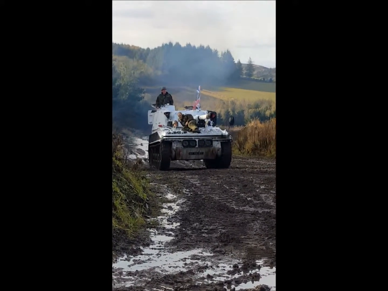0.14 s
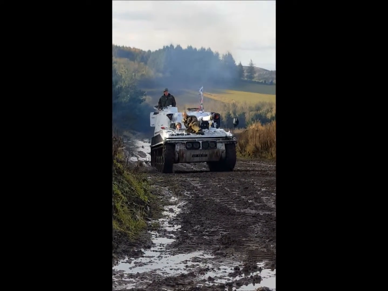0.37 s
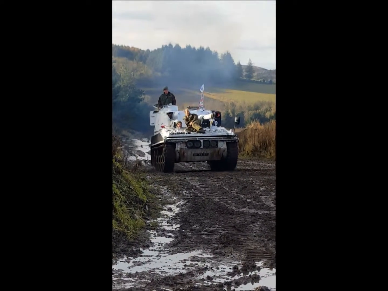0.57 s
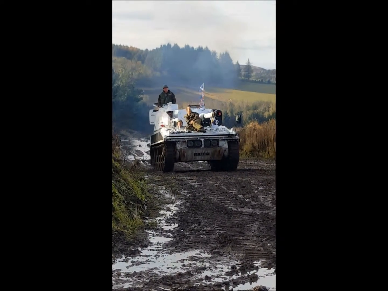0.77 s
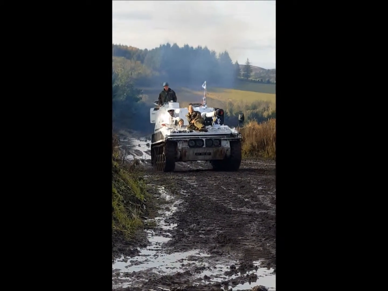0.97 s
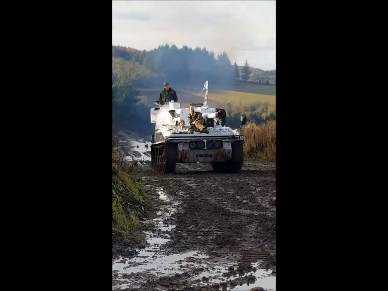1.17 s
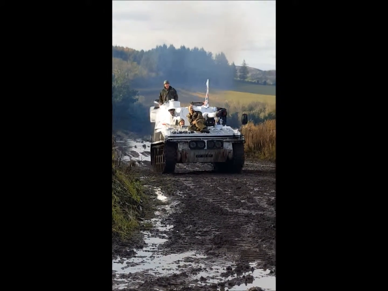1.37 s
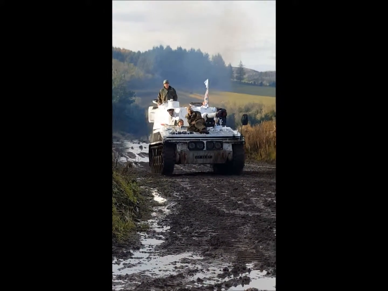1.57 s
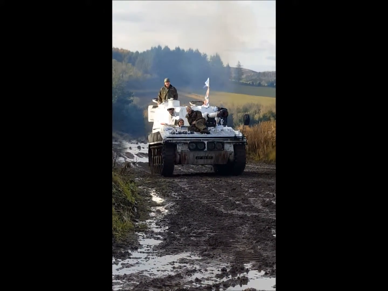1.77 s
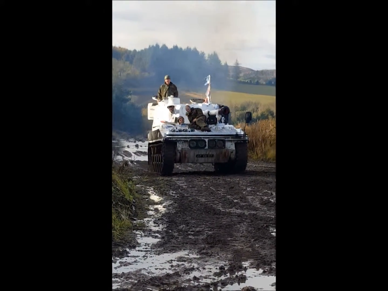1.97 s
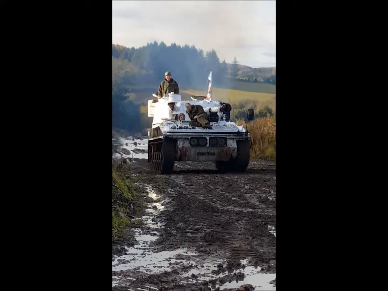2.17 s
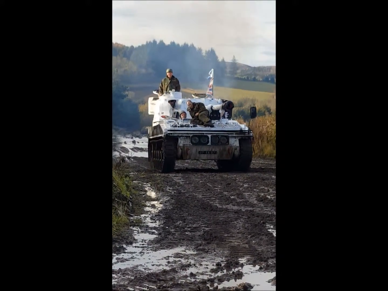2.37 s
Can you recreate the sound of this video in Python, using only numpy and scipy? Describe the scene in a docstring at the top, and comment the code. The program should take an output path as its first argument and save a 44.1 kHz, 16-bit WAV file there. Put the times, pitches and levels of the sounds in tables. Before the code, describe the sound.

Steady low engine hum and buzzing exhaust of a tracked vehicle dominate, over uneven bass rumble, rattling machinery and faint mud hiss, with short track groans near the end; open air, stereo microphone in front.

```python
"""Muddy track: a tracked vehicle crawls toward the microphone, its six-cylinder engine at near-steady revs.
Exhaust: a tone at the firing rate, cycle-locked lines of the uneven cylinders, gas noise puffed by the firings.
Machinery: partly repeating valve-gear noise; gear and fan tones at fixed multiples of the engine cycle.
Tracks: mud hiss and random crackle grains, noise-band scrapes, jittered sine groans and squeaks.
Below them, low-passed noise rumbles unevenly."""
import sys
import numpy as np
from scipy import signal
from scipy.fft import rfft, irfft
from scipy.io import wavfile
from scipy.ndimage import uniform_filter1d, map_coordinates

SR = 44100
rng = np.random.default_rng(int(sys.argv[2]) if len(sys.argv) > 2 else 0)


def file_out(sig):
    """Save sig as 16-bit WAV at sys.argv[1]."""
    # one column per channel
    cols = np.atleast_2d(sig).T
    # limit, then scale
    lim = np.clip(cols, -1, 1)
    pcm = np.round(lim * 32767).astype(np.int16)
    wavfile.write(sys.argv[1], SR, pcm)


N = 111573
CYLINDERS = 6
LEFT_RIGHT = np.array([[1], [-1]])


def undb(db):
    """Decibels to gain."""
    return 10 ** (np.asarray(db) / 20)


def unit(x):
    """Scale to rms 1."""
    return x / np.sqrt(np.mean(x ** 2))


def curve(rows):
    """Interpolate (time [s], value) rows to every sample."""
    return np.interp(np.arange(N) / SR, *np.array(rows, float).T)


def per_bin(rows):
    """Interpolate (frequency [Hz], level [dB]) rows to every FFT bin, on a log frequency axis."""
    hz, db = np.array(rows, float).T
    bin_hz = np.arange(N // 2 + 1) * SR / N
    return np.interp(np.log(bin_hz + 1), np.log(hz), db)


def noise():
    """White noise."""
    return rng.standard_normal(N)


def walk(rate_hz):
    """Smooth random control signal of rms 1, redrawn about rate_hz times a second."""
    hold = max(int(SR / rate_hz), 2)
    steps = noise()[np.arange(N) // hold]
    return unit(uniform_filter1d(uniform_filter1d(steps, hold), hold))


def swell(start_s, length_s):
    """Half-sine rise and fall."""
    return np.sin(np.pi * np.clip((np.arange(N) / SR - start_s) / length_s, 0, 1))


# stereo width: (frequency [Hz], side relative to mid [dB])
SIDE_TO_MID = [(30, 3), (80, -3.5), (200, -8), (350, -21), (520, 3), (760, -14), (1300, -8), (2000, -8),
               (3200, -9.5), (4400, -6.5), (5500, -4.5), (6500, -3), (8800, -2), (13000, -7)]
# stereo balance: (frequency [Hz], left relative to right [dB])
LEFT_TO_RIGHT = [(200, 0.5), (380, -7.5), (690, 5), (1280, -2), (2360, 1.5), (4350, -3.5), (8000, 0),
                 (14800, 0.5)]


def place(mid, side, spectrum):
    """Colour two unrelated signals and spread them left and right; the centre has rms 1."""
    both = rfft(mid) + LEFT_RIGHT * rfft(side) * undb(per_bin(SIDE_TO_MID))
    colour = undb(per_bin(spectrum) + LEFT_RIGHT * per_bin(LEFT_TO_RIGHT) / 2)
    out = irfft(both * colour, N)
    return out / np.std(out.mean(axis=0))


# firing tone: (time [s], level [dB])
BOOM_LEVEL = [(0, -23), (.07, -12.5), (.2, -12.5), (.33, -16.5), (.42, -18.5), (.57, -15), (.8, -15.2),
              (1.05, -15), (1.27, -16), (1.45, -14), (1.62, -12.5), (1.85, -14), (2.19, -12), (2.42, -14.5),
              (2.53, -13)]
# all cylinder lines together, before DRONE_DB: (time [s], level [dB])
DRONE_LEVEL = [(0.02, -22.5), (0.31, -22), (0.32, -24), (0.7, -18), (0.97, -20), (2.49, -17.5), (2.5, -17)]
# cylinder lines: (multiple of engine cycle rate, relative level [dB])
EXHAUST_LINES = [(2, -37.5), (3, -31), (4, -30), (7, -22.5), (8, -14), (9, -11), (10, -12.5), (12, -12),
                 (13, -22.5), (14, -22.5), (15, -26), (16, -22.5), (17, -31), (18, -31.5), (19, -32),
                 (20, -39), (21, -31), (23, -39.5), (27, -35.5), (32, -34), (34, -32)]
# gas noise: (time [s], level [dB])
GAS_LEVEL = [(0, -29.5), (.15, -27), (.36, -28.5), (.55, -29.5), (.95, -29), (1.4, -32.5), (1.85, -33),
             (2.19, -27.5), (2.4, -30), (2.53, -24.5)]
# gas noise: (frequency [Hz], relative level [dB per Hz])
GAS_SPECTRUM = [(90, -25), (140, -4.5), (200, -1.5), (290, -2.5), (375, 1.5), (420, -8), (560, -16.5),
                (900, -47.5)]
DRONE_DB = -0.67
PIPE_LAG_RAD, PIPE_SPREAD_RAD = .9, .91  # cycle phase delay; phase per squared multiple


def exhaust(turn, waver_db=1.56, boom_waver_db=0.4, puff=0.92):
    """Firing tone, uneven-cylinder lines delayed and smeared by the pipe, gas puffed at each firing."""
    boom_gain = undb(curve(BOOM_LEVEL) + boom_waver_db * walk(30))
    boom = np.sqrt(2) * np.cos(CYLINDERS * turn) * boom_gain
    lines = 0
    for multiple, db in EXHAUST_LINES:
        phase = multiple * (turn - PIPE_LAG_RAD) - PIPE_SPREAD_RAD * multiple ** 2
        lines = lines + undb(db + waver_db * walk(9)) * np.cos(phase)
    drone = undb(curve(DRONE_LEVEL) + DRONE_DB) * unit(lines)
    gate = 1 + puff * np.cos(CYLINDERS * turn)
    gas = place(noise() * gate, noise() * gate, GAS_SPECTRUM)
    return boom + drone + undb(curve(GAS_LEVEL)) * gas


# clatter and whines, before their own offsets: (time [s], level [dB])
MACHINE_LEVEL = [(0.02, -32), (0.05, -33), (0.07, -31.5), (0.41, -31.5), (1.44, -31), (2.5, -29.5)]
# clatter: (frequency [Hz], relative level [dB per Hz])
CLATTER_SPECTRUM = [(350, -10), (480, -4), (580, -3.5), (760, 4.5), (860, -4), (1000, -4.5), (1200, 0.5),
                    (1450, 2.5), (1760, -4), (1850, 0.5), (1980, -8.5), (2300, -7), (2470, -16),
                    (2650, -9.5), (2920, -9), (3200, -11), (3520, -9.5), (3760, -10), (3950, -17.5),
                    (5500, -24.5), (7000, -25), (15000, -60)]
CLATTER_DB = -1
CYCLE_POINTS = 1944  # noise values stored per engine cycle


def repeated_noise(turn):
    """One engine cycle of flat-spectrum noise, read again every cycle."""
    random_phases = 2j * np.pi * rng.random(CYCLE_POINTS // 2 + 1)
    one_cycle = irfft(np.exp(random_phases))
    position = turn / (2 * np.pi) * CYCLE_POINTS
    return unit(map_coordinates(one_cycle, [position], mode="grid-wrap"))


def clatter(turn, repeat_share=0.42, cycle_db=0.5, crank_db=0.33, firing_db=0.5, flicker_db=0.41):
    """Valve gear and casing: noise that partly repeats each engine cycle and throbs with the crank."""
    throb_db = cycle_db * np.cos(turn) + crank_db * np.cos(2 * turn)
    throb_db = throb_db + firing_db * np.cos(CYLINDERS * turn) + flicker_db * walk(20)

    def rattle():
        """Mix repeating and fresh noise by power share, then throb."""
        mix = np.sqrt(repeat_share) * repeated_noise(turn) + np.sqrt(1 - repeat_share) * noise()
        return undb(throb_db) * mix

    return place(rattle(), rattle(), CLATTER_SPECTRUM) * undb(curve(MACHINE_LEVEL) + CLATTER_DB)


# whine frequencies: multiples of engine cycle rate
WHINE_MULTIPLES = [48.75, 52, 60, 74.8, 80.3, 82.2, 99.6, 150.4, 164.5]
# same order: (relative level [dB], left relative to right [dB], left phase lead [rad], throb per cycle [dB])
WHINE_SETTINGS = [(-6, 4, -0.88, 0.9), (-17, -0.5, -0.7, 1.5), (-9, -10.5, -0.61, 5), (-16, -11, 0.6, 2.5),
                  (-18.5, 1, .8, 1.5), (-13.5, 7, .7, 4), (-24, -1, 0, 3), (-17, -9, 0, 1),
                  (-24, -5, .3, 2.5)]
# main gear whine swell: (time [s], added level [dB])
GEAR_SWELL = [(0, 2), (.2, 0.5), (.4, -5), (.72, -6), (1.1, 0), (1.35, 5), (1.85, 3), (2.25, -1.5),
              (2.47, 2)]
# high whine swell: (time [s], added level [dB])
HIGH_SWELL = [(0, -1), (.45, 2.5), (1.3, 2), (1.75, -2.5), (2.05, -2), (2.2, 4.5), (2.53, -0.5)]
GEAR_MULTIPLE, HIGH_MULTIPLE = 60, 150.4
WHINES_DB = -3.0


def whines(turn, waver_db=1.1, wander_rad=0.38, shake_rad=0.17):
    """Gear and fan tones locked to the engine; each throbs once a cycle, wavering in level and phase."""
    out = 0
    for multiple, (db, pan_db, lead_rad, throb_db) in zip(WHINE_MULTIPLES, WHINE_SETTINGS):
        start_phase = 2 * np.pi * rng.random()
        phase = multiple * turn + start_phase + wander_rad * walk(12.1) + shake_rad * walk(90)
        throb = unit(undb(throb_db * np.cos(turn + 2 * np.pi * rng.random())))
        level_db = db + waver_db * walk(18)
        if multiple == GEAR_MULTIPLE:
            level_db = level_db + curve(GEAR_SWELL)
        if multiple == HIGH_MULTIPLE:
            level_db = level_db + curve(HIGH_SWELL)
        gain = throb * undb(level_db + LEFT_RIGHT * pan_db / 2)
        out = out + gain * np.cos(phase + LEFT_RIGHT * lead_rad / 2)
    return out * np.sqrt(2) * undb(curve(MACHINE_LEVEL) + WHINES_DB)


# wet mud: (frequency [Hz], relative level [dB per Hz])
MUD_SPECTRUM = [(1500, -1), (4200, 4.5), (5900, 5), (6500, -11), (7700, -2.5), (8200, -4), (8800, 3.5),
                (9700, -8.5), (13000, -13), (15000, -44)]
MUD_DB, CRACKLE_DB, MUD_RISE_DB_PER_S = -50, -57.5, 1.0


def tracks(flicker_db=1.17, grains_per_s=220, scatter_db=5.0):
    """Wet mud hisses (noise) and crackles (random clicks) under the links, louder as they come near."""
    t = np.arange(N) / SR

    def grains():
        """Single-sample clicks of random time, sign and size."""
        hits = rng.random(N) < grains_per_s / SR
        size = undb(scatter_db * np.minimum(rng.exponential(size=N), 4))
        return hits * np.sign(noise()) * size

    hiss = undb(MUD_DB) * place(noise(), noise(), MUD_SPECTRUM)
    crackle = undb(CRACKLE_DB) * place(grains(), grains(), MUD_SPECTRUM)
    return (hiss + crackle) * undb(MUD_RISE_DB_PER_S * (t - t.mean()) + flicker_db * walk(17))


# link scrapes: (start [s], length [s], centre frequency [Hz], level at swell top [dB])
SCRAPE_EVENTS = [(1.91, .07, 2900, -44), (2.13, 0.11, 2870, -45), (2.16, .07, 650, -34),
                 (2.233, 0.075, 9500, -53), (2.325, 0.11, 3170, -43)]
SCRAPE_OCTAVES = 0.47  # from band centre to -6 dB


def scrapes(rough_db=2):
    """Links grind briefly over stones: swelling noise bands of rough level."""
    out = 0
    for start_s, length_s, hz, db in SCRAPE_EVENTS:
        band = [(hz * 2 ** (SCRAPE_OCTAVES * k), -6 * k ** 2) for k in range(-3, 4)]
        gain = swell(start_s, length_s) * undb(db + rough_db * walk(200))
        out = out + place(noise(), noise(), band) * gain
    return out


# groans and squeaks: (start [s], length [s], frequency [Hz], peak level [dB], pitch jitter [Hz])
SQUEAK_EVENTS = [(1.785, .08, 728, -35, 12), (2.228, .046, 12480, -44, 70), (2.272, .022, 11950, -53, 120),
                 (2.285, .02, 12760, -53, 120), (2.29, .1, 748, -29, 12), (2.33, .11, 3500, -42, 30)]


def squeaks():
    """Dry track pins groan and give a thin, broken squeak: swelling sines of jittered pitch."""
    out = 0
    for start_s, length_s, hz, db, jitter_hz in SQUEAK_EVENTS:
        phase = 2 * np.pi * np.cumsum(hz + jitter_hz * walk(500)) / SR
        out = out + undb(db) * swell(start_s, length_s) * np.sin(phase)
    return out


# rumble, before RUMBLE_DB: (time [s], level [dB])
RUMBLE_LEVEL = [(0.02, -38.5), (0.24, -34), (0.3, -27.5), (0.53, -42), (0.56, -34.5), (1.5, -33.5),
                (1.53, -36.5), (1.66, -31), (1.7, -34), (1.72, -31), (1.91, -32), (2.28, -28), (2.31, -37),
                (2.4, -31), (2.44, -36), (2.5, -25)]
# rumble: (frequency [Hz], relative level [dB per Hz])
RUMBLE_SPECTRUM = [(20, -27), (32, -8), (48, -5.5), (70, 4.5), (95, 3), (130, 0.5), (250, -4), (500, -53)]
RUMBLE_DB = 3.5


def rumble():
    """Low noise of uneven level, wide between left and right."""
    return place(noise(), noise(), RUMBLE_SPECTRUM) * undb(curve(RUMBLE_LEVEL) + RUMBLE_DB)


# engine speed: (time [s], firing rate [Hz])
FIRING_RATE = [(0, 137.2), (.48, 137.1), (.95, 136.25), (1.35, 136.1), (1.52, 135.6), (1.8, 135.9),
               (2.18, 136.15), (2.45, 136.9), (2.53, 136.9)]


def scene():
    """Engine cycle phase drives exhaust, clatter and whines; tracks and rumble run beside it."""
    turn = 2 * np.pi * np.cumsum(curve(FIRING_RATE)) / CYLINDERS / SR
    engine = exhaust(turn) + clatter(turn) + whines(turn)
    return engine + tracks() + scrapes() + squeaks() + rumble()


TOP_HZ = 14700


def record(dry):
    """The recorder cuts the top: steep elliptic low-pass."""
    low_pass = signal.ellip(8, .2, 70, TOP_HZ, fs=SR, output="sos")
    return signal.sosfilt(low_pass, dry)


dry = scene()
out = record(dry)
file_out(out)
```